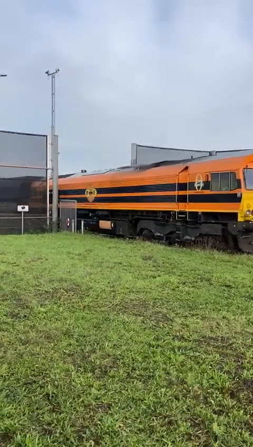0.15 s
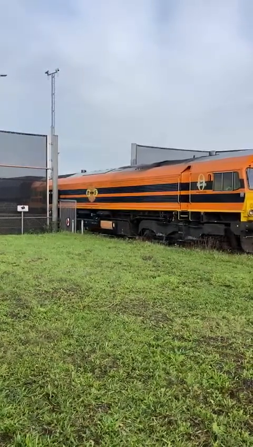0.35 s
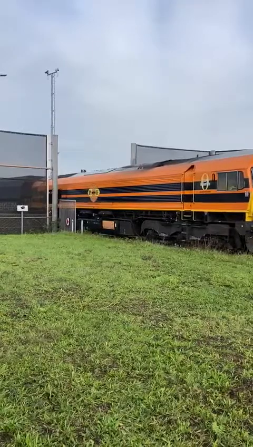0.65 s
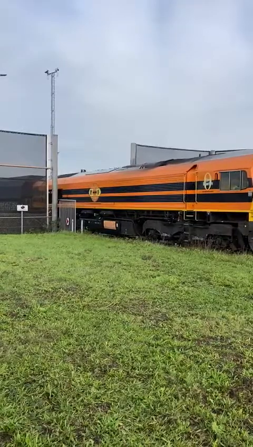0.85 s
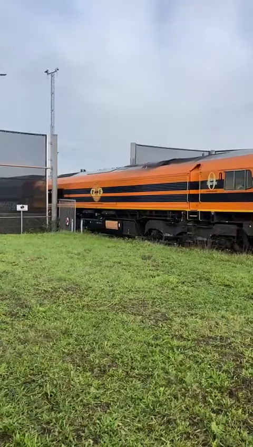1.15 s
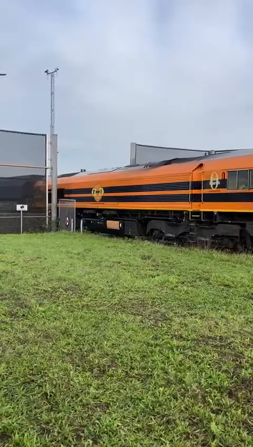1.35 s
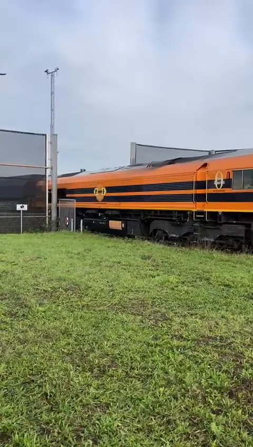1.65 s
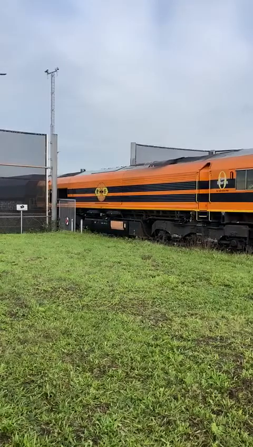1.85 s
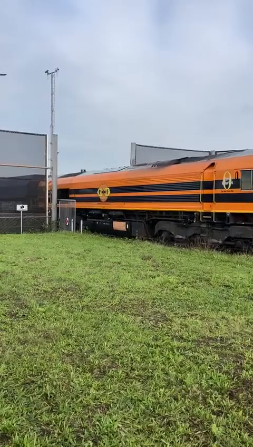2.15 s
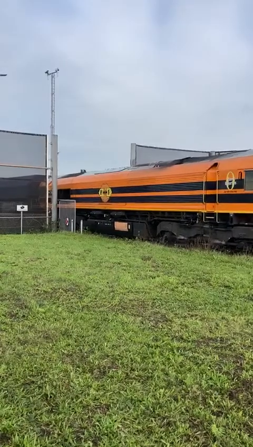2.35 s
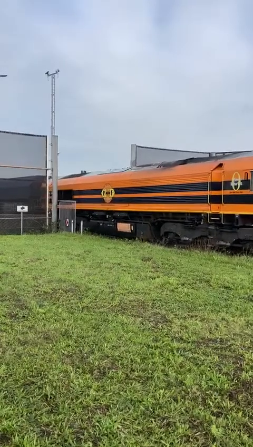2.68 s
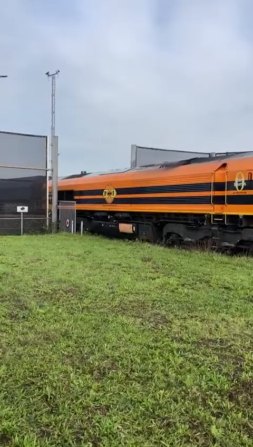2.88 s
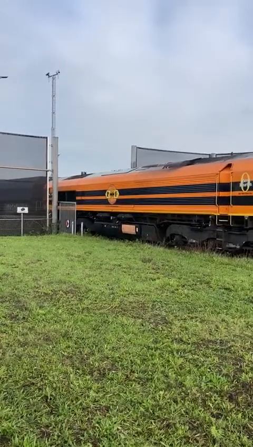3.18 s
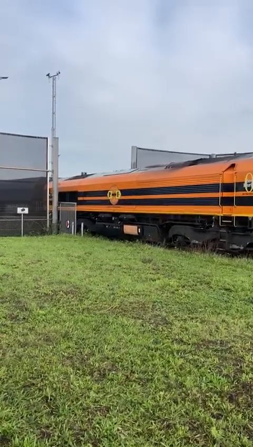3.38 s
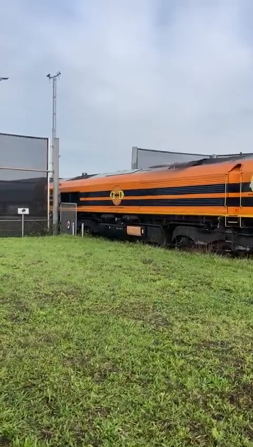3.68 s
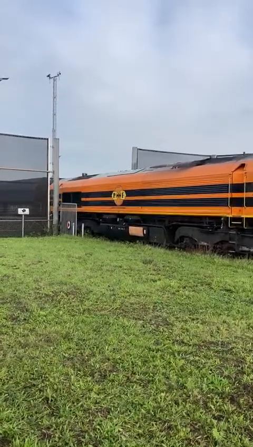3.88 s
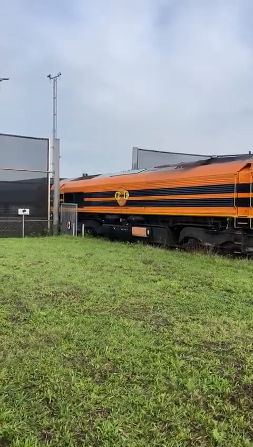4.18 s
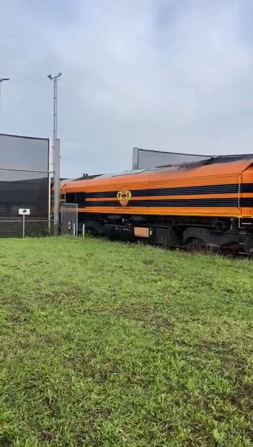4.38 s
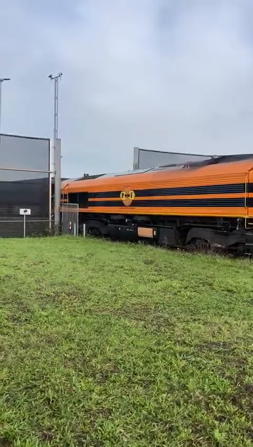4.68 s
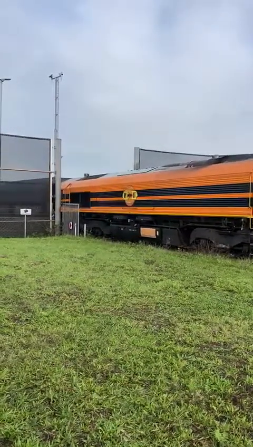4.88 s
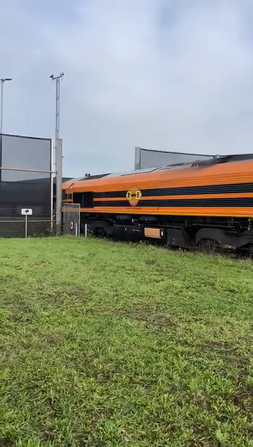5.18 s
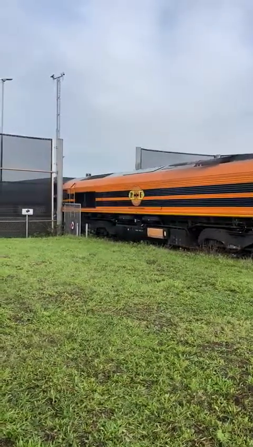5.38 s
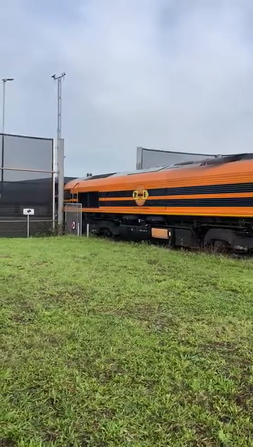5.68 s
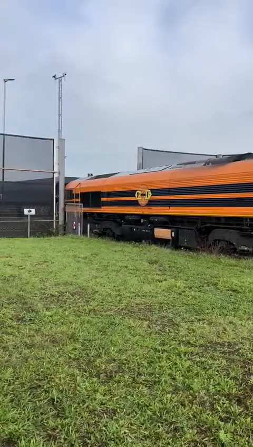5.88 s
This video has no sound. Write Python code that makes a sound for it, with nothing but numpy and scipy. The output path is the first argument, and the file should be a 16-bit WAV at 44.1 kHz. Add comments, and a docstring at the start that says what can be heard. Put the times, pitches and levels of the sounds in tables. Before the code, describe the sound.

A heavy diesel locomotive works slowly past a handheld stereo microphone at the edge of a grass field. From 0 s a deep, uneven exhaust throb pulses about eight times a second, rising in strength until about 1.6 s, then holding nearly steady to the end at 6 s. Over it lie dull block knocks, a dense metallic rattle, a broad fan and blower roar, and thin wavering whines that swell as the intakes draw level. Low wind buffets the microphone at the start, around 0.9 and 1.2 s, and more roughly near 2.1 s. A brighter chug stands out from about 1.9 to 3.5 s. At 2.8 s a valve spits a short, sharp hiss, leaving a faint leak of air. A fine high blower tone peaks near 4 s. At 5.4 s a second, stronger hiss swells for about a quarter second and dies abruptly, while the engine rumbles on.

```python
"""A two-stroke diesel locomotive creeps past under load, heard across a grass field.
Its exhaust and knocking block are sums of tones locked to the crank, so they throb once a turn.
Shaped noise makes the roar of fans and blower, the whines, and the air that valves vent twice.
Wind, as low lumpy noise, buffets the handheld stereo microphone."""
import sys
import numpy as np
from scipy import signal
from scipy.fft import rfft, irfft, next_fast_len
from scipy.io import wavfile
from scipy.ndimage import uniform_filter1d, map_coordinates

SR = 44100
rng = np.random.default_rng(int(sys.argv[2]) if len(sys.argv) > 2 else 0)


def pcm_store(signal):
    """Save signal as 16-bit PCM."""
    levels = np.round(np.clip(np.atleast_2d(signal), -1, 1) * 32767)
    wavfile.write(sys.argv[1], SR, levels.astype(np.int16).T)


N = 265923
SECONDS = np.arange(N) / SR
FRAME = 512  # samples in a short-time spectrum

# Gusts on the microphone. Each row: middle in seconds, half length in seconds, level in dB before
# shaping, top of the buffeting in Hz.
GUSTS = [(0.055, 0.051, -16, 129), (0.894, 0.12, -20.5, 70.4), (1.189, 0.053, -9, 110),
         (2.033, 0.03, -12, 60), (2.11, 0.052, -7.5, 944), (2.157, 0.012, -8, 130),
         (2.204, 0.013, -10.5, 300)]
GUST_LOW_HZ = 60  # the top never sinks below this
GUST_EDGE, GUST_PEAKING = 2.2, 0.67  # steepness of the level's edges, of the rise in top pitch
BREEZE_DB, BREEZE_FADE_DB_PER_S, BREEZE_HZ, BREEZE_LUMPS_DB = -22.5, 4.5, 71, -3

# Fans, blower and combustion. Each row: frequency in Hz, relative density in dB per Hz.
ROAR_SPECTRUM = [(25, -34), (45, -16), (80, -11), (130, -14), (220, -19), (400, -27), (650, -24),
                 (820, -27), (1050, -25), (1400, -30), (1900, -33), (2400, -34), (2800, -38), (4400, -40),
                 (5500, -44), (7700, -46), (9500, -52), (11000, -56)]
ROAR_DB, ROAR_FOLLOWS = -27.5, 0.076  # level, share of the exhaust's swing

# Narrow whines of blower and turbocharger. Each row: centre in Hz, width of one filter pass in Hz,
# level in dB before the swell.
WHINES = [(1910, 30, -53), (3250, 70, -51), (3400, 250, -49), (4270, 120, -54), (7700, 150, -52)]
# The whines swell as the air intakes draw level. Each row: time in seconds, gain in dB.
WHINE_SWELL = [(0, 0), (1.3, 5.5), (3.4, 2.5), (4.0, 3.5), (4.5, 4), (6.03, 4.5)]

# Hiss of escaping air. Each row: frequency in Hz, relative density in dB per Hz.
JET_SPECTRUM = [(700, -11), (1500, -15), (2350, -4), (2900, -12.5), (3500, -6), (4500, -4), (6500, 3.5),
                (7500, 2.5), (9000, 7.5), (11000, -0.5)]
# Valves vent air. Each row: opening in seconds, first spit below the peak in dB, swell in seconds,
# hold in seconds, peak in dB before the body lift, dying in dB per second, lift of the body under
# 4 kHz in dB, time to crack open in seconds.
VENTS = [(2.821, 8.5, 0.084, 0.016, -21, 118, 7.5, .002), (5.401, 19, 0.16, 0.1, -15.5, 203, 10.5, 0.042)]
SEEP_DB = -48.5

# Two gear meshes sing close together. Each row: time in seconds, upper tone in dB, lower tone in dB.
GEAR_LEVELS = [(0, -50, -51), (.3, -33, -31.5), (.85, -37, -46), (1.25, -34.5, -42), (2.1, -31, -47),
               (2.6, -27, -31), (3.0, -30.5, -31), (3.7, -32, -35.5), (4.2, -38, -37), (4.7, -32, -45),
               (5.05, -34, -40), (5.25, -34, -35.5), (6.03, -41, -26.5)]
UPPER_GEAR_ORDER, LOWER_GEAR_ORDER = 117.2, 113  # multiples of crank speed

# Thin tones of the geared blower. Each row: multiple of crank speed, relative level in dB.
BLOWER_TONES = [(283.6, -6), (503.6, -8), (515.4, 0)]
# They follow this as the intake draws level. Each row: time in seconds, gain in dB.
BLOWER_LEVEL = [(0, -51.5), (1.3, -47.5), (2.8, -48.5), (3.7, -43), (4.0, -37.5), (4.6, -44.5), (5.05, -42),
                (5.5, -51), (6.03, -32.5)]

# Valve gear and injectors rattle: orders (the last left out), level, spread between orders,
# fall per octave, rate of change.
RATTLE_FIRST, RATTLE_LAST = 92, 330
RATTLE_DB, RATTLE_SPREAD_DB, RATTLE_FALL_DB, RATTLE_CHANGE_PER_S = -38.5, 2, 6, .5

# Tones locked to the crank. Each row: multiple of crank speed (its order), relative level in dB.
CRANK_TONES = [(5, -33), (7, -39), (9, -20), (10, -20), (11, -28), (12, -31), (13, -31), (14, -36),
               (15, -40), (16, -38), (17, -36), (18, -35), (19, -38), (20, -45), (21, -46), (22, -44),
               (24, -41), (25, -40), (26, -46), (27, -42), (28, -39), (29, -46), (30, -36), (32, -38),
               (33, -45), (34, -35), (35, -47), (37, -45), (38, -40), (39, -41), (40, -38), (41, -39),
               (42, -46), (45, -47), (46, -45), (47, -39), (48, -40), (49, -44), (50, -49), (51, -47),
               (52, -47), (54, -39), (55, -42), (56, -39), (57, -40), (59, -42), (60, -43), (61, -44),
               (63, -38), (64, -47), (65, -45), (66, -43), (67, -45), (68, -42), (69, -43), (71, -39),
               (72, -42), (73, -42), (74, -39), (75, -43), (76, -44), (77, -41), (78, -39), (79, -30),
               (80, -41), (81, -37), (82, -40), (83, -41), (84, -42), (85, -42), (86, -36), (87, -37),
               (88, -39), (90, -46), (91, -49), (96, -50), (97, -48), (99, -51), (101, -50), (103, -51),
               (105, -50), (112, -45), (119, -49), (152, -48), (158, -45), (200, -49), (226, -47)]
# The governor brings the crank down to its set speed without overshoot.
SET_SPEED, SPEED_EXCESS, SETTLE_S = 8.1752, .0635, .658  # turns per s, first excess, seconds
# The engine room draws past. Each row: time in seconds, exhaust gain in dB.
PASSING = [(0, -9.5), (.5, -3.5), (1.6, 1.5), (3.0, 0), (4.4, 2.5), (6.03, 0)]
LAST_EXHAUST_ORDER = 12
THROB_TURN, THROB_SKEW = .554, -.8  # crank angle of the throb (turns), skew of its pulse (rad)
SILENCER_ORDER, SILENCER_LAG = 10.5, 1.3  # orders above its resonance lag behind (rad)
PIPE_ORDER = 8  # orders under the stack's resonance push in opposite phase

BLOCK_DB, BLOCK_FOLLOWS = 0.5, 0.055  # engine block: level, share of the exhaust's swing
# Knocks that ring in the block each turn, from dull thumps to a bright one. Each row: first order,
# last order, crank angle in turns, scatter in rad, lead of its top orders over its bottom ones in turns.
KNOCKS = [(13, 17, .255, .25, 0), (18, 19, .735, .25, 0), (20, 29, .63, 1.0, 0), (54, 75, .17, .8, .3),
          (76, 90, .3, .5, 0)]
REBOUND_TURN = .26  # the bright knock's second blow follows after (turns)
SLIP_ORDER = 30  # orders below this fade and slip the less, the lower they lie
FADING_DB = 2.2  # spread of the fading of single orders
# The top of the bright knock stands out for a while. Each row: time in seconds, gain in dB.
CHUG = [(0, -3), (1.2, -2), (1.9, 2), (3.45, 2.5), (3.65, -3.5), (6.03, -3.5)]
CHUG_ORDER = 80  # lowest order the chug lifts
# The low hum of the block thins out late.
HUM_FIRST, HUM_LAST, HUM_FADE_S, HUM_FADE_DB_PER_S = 35, 45, 4.7, 4

# Stereo by frequency. Each row: frequency in Hz, right channel's lead in rad, left louder by in dB,
# level of the unlike part in dB.
STEREO = [(60, .2, 5, -16), (260, .4, 6, -11), (600, 1.8, 3, -6), (800, 2.0, 0, -5), (1400, 1.5, 0, -2),
          (1750, 1.4, 0, -2), (2250, 2.4, -4, 0), (2750, 2.5, 0, -3), (3450, 2.5, 0, -5),
          (4250, 1.7, 0, -3), (4500, 2.4, 0, -10), (4750, 3.14, 0, -35), (6300, 3.14, 0, -35),
          (6900, 2.0, 0, -2), (7700, 1.0, 0, -5), (7950, 0, 0, -35), (9600, 0, 0, -35),
          (10200, -1.6, 0, -3), (10700, -2.6, 0, -10), (10950, -3.14, 0, -50)]
# Stereo of the vented hiss: its channels oppose each other over a narrower treble band.
# Each row: frequency in Hz, right channel's lead in rad, left louder by in dB, level of the unlike
# part in dB.
HISS_STEREO = [(4850, 2.0, 0, -6), (5100, 3.14, 0, -35), (5650, 3.14, 0, -35), (5950, 2.8, 0, -16),
               (6400, 1.8, 0, -5)]
# Both channels share one bass below a corner that holds, then sinks steadily.
MONO_HZ, MONO_HOLD_S, MONO_SINK_HZ_PER_S = 910, 2.77, 395

DUCK_ABOVE_DB, DUCK_SHARE, DUCK_ATTACK_S, DUCK_RELEASE_DB_PER_S = -19, .6, .09, 12
CUTOFF_HZ = 11700


def amp(db):
    """Gain of a dB value."""
    return 10 ** (np.asarray(db) / 20)


def rms_one(x):
    """Scale to rms 1."""
    return x / np.sqrt(np.mean(x ** 2))


def curves(rows, at):
    """Each further column of a table, read along its first column."""
    first, *columns = np.transpose(rows)
    return [np.interp(at, first, column) for column in columns]


def over_hz(rows, hz):
    """Columns of a table read on a log-frequency axis."""
    log_rows = [(np.log(row[0]), *row[1:]) for row in rows]
    return curves(log_rows, np.log(np.maximum(hz, 1)))


def drift(rate):
    """Slow chance: random points joined smoothly, rate a second, spread about 1."""
    coarse = np.arange(0, N + 64, 64)
    points = rng.standard_normal(400)
    smooth = map_coordinates(points, [coarse / SR * min(rate, 60)], order=3)
    return np.interp(np.arange(N), coarse, smooth)


def frames(x):
    """Short-time spectrum: Hz as a column, seconds, values."""
    hz, s, z = signal.stft(x, SR, nperseg=FRAME)
    return hz[:, None], s, z


def samples(z):
    """Back from short-time spectra to N samples."""
    return signal.istft(z, SR, nperseg=FRAME)[1][..., :N]


def coloured(spectrum):
    """Noise with the given spectrum, rms 1."""
    size = next_fast_len(N)
    db, = over_hz(spectrum, np.fft.rfftfreq(size, 1 / SR))
    white = rfft(rng.standard_normal(size))
    return rms_one(irfft(white * amp(db), size)[:N])


def patchy(x, patch_db, rate):
    """Each half octave swells and sinks on its own."""
    hz, s, z = frames(x)
    half_octaves = 2 * np.log2(np.maximum(hz, 30) / 30)
    grid = np.broadcast_arrays(half_octaves, min(rate, 60) * s)
    patches = map_coordinates(rng.standard_normal((22, 400)), grid, order=1)
    return samples(z * amp(patch_db * patches))


def breeze():
    """Low lumpy rumble on the microphone that dies away."""
    band = signal.butter(2, [36, BREEZE_HZ], "band", fs=SR, output="sos")
    rumble = rms_one(signal.sosfilt(band, rng.standard_normal(N)))
    return rumble * amp(BREEZE_DB - BREEZE_FADE_DB_PER_S * SECONDS + BREEZE_LUMPS_DB * drift(6.9))


def wind():
    """Gusts of lumpy pressure noise that reach higher in the middle, over the breeze."""
    hz, s, z = frames(rng.standard_normal(N) * amp(1.5 * drift(35.)))
    level, top_hz = np.zeros(len(s)), np.full(len(s), float(GUST_LOW_HZ))
    for middle, half, db, gust_hz in GUSTS:
        off = np.abs(s - middle) / half
        level = level + amp(db) * np.exp(-off ** GUST_EDGE)
        top_hz = np.maximum(top_hz, gust_hz * np.exp(-GUST_PEAKING * off ** 2))
    eddies = hz / (hz + 0.26 * top_hz)  # fast air breaks into small eddies and thins the bass
    rolloff = 1 / (1 + (hz / top_hz) ** 3.84)
    narrowing_gain = np.sqrt(SR / 2 / top_hz)  # makes up for the narrower band
    gust = samples(z * level * eddies * rolloff * narrowing_gain)
    high_pass = signal.butter(2, 35, "high", fs=SR, output="sos")
    return signal.sosfilt(high_pass, gust) + breeze()


def seep():
    """A thin steady leak of air, from the first valve's opening until the last begins to die."""
    opens, _, swell, hold = VENTS[-1][:4]
    leaking = (SECONDS > VENTS[0][0]) * (SECONDS < opens + swell + hold)
    return amp(SEEP_DB) * leaking * coloured(JET_SPECTRUM)


def vented_air():
    """A bright turbulent jet: each valve spits open, swells, holds and dies; its body depends on the valve."""
    jet = patchy(coloured(JET_SPECTRUM), patch_db=3.2, rate=50.)
    body = signal.sosfilt(signal.butter(2, 4000, fs=SR, output="sos"), jet)
    out = np.zeros(N)
    for opens, spit_db, swell, hold, peak_db, dying_db, body_db, crack in VENTS:
        since = SECONDS - opens
        below_db = spit_db * np.clip(1 - since / swell, 0, 1)
        died_db = dying_db * np.maximum(since - swell - hold, 0)
        opening = np.clip(since / max(crack, 1 / SR), 0, 1)
        out += opening * amp(peak_db - below_db - died_db) * (jet + (amp(body_db) - 1) * body)
    return out


def roar(exhaust_db):
    """Broad turbulent noise of fans, blower and combustion, faintly following the exhaust."""
    noise = patchy(coloured(ROAR_SPECTRUM), patch_db=1.3, rate=8.)
    return amp(ROAR_DB + ROAR_FOLLOWS * exhaust_db) * noise


def whines():
    """Noise twice through each narrow resonance, wavering in level under a common swell."""
    out = np.zeros(N)
    for hz, width_hz, db in WHINES:
        r = np.exp(-np.pi * width_hz / SR)
        section = [1, 0, -1, 1, -2 * r * np.cos(2 * np.pi * hz / SR), r * r]
        ringing = signal.sosfilt([section, section], rng.standard_normal(N))
        out += amp(db + .8 * drift(1.5)) * rms_one(ringing)
    swell_db, = curves(WHINE_SWELL, SECONDS)
    return amp(swell_db) * out


def crank_angle():
    """Crank angle in radians, as the speed settles with critical damping."""
    settling = SECONDS / SETTLE_S
    speed = SET_SPEED + SPEED_EXCESS * (1 + settling) * np.exp(-settling)
    return 2 * np.pi * np.cumsum(speed) / SR


def gears(crank):
    """Two thin wavering tones geared to the crank."""
    upper_db, lower_db = curves(GEAR_LEVELS, SECONDS)
    upper = np.cos(UPPER_GEAR_ORDER * crank + 0.35 * drift(5.0))
    lower = np.cos(LOWER_GEAR_ORDER * crank + 0.35 * drift(5.0))
    return amp(upper_db + 2.5 * drift(8.0)) * upper + amp(lower_db + 2.5 * drift(12.0)) * lower


def blower(crank):
    """Thin tones geared to the crank, flickering a little."""
    level_db, = curves(BLOWER_LEVEL, SECONDS)
    tones = np.zeros(N)
    for order, db in BLOWER_TONES:
        tones += amp(db + 2.4 * drift(6.0)) * np.cos(order * crank + .35 * drift(15.0))
    return amp(level_db) * tones


def rattle(crank):
    """A dense pattern of small contacts repeated each turn; three such patterns fade slowly in and out."""
    orders = np.arange(RATTLE_FIRST, RATTLE_LAST)
    turns = crank / (2 * np.pi) % 1
    out = np.zeros(N)
    for _ in range(3):
        fall_db = RATTLE_FALL_DB * np.log2(orders / RATTLE_FIRST)
        db = RATTLE_SPREAD_DB * rng.standard_normal(len(orders)) - fall_db
        lines = np.zeros(4097, complex)
        lines[orders] = amp(db) * np.exp(2j * np.pi * rng.random(len(orders)))
        pattern = irfft(lines)  # one turn of the crank
        angles = np.arange(len(pattern)) / len(pattern)
        out += drift(RATTLE_CHANGE_PER_S) * np.interp(turns, angles, pattern, period=1)
    running_power = uniform_filter1d(out ** 2, size=20000)
    return amp(RATTLE_DB) * rms_one(out / np.sqrt(running_power + 1e-12))  # held level


def knock_phase(order):
    """Phase lag that lines an order up with its knock's blow; orders outside the knocks fall at random."""
    late = rng.uniform(0, 2 * np.pi)
    for first, last, turn, scatter, lead in KNOCKS:
        if first <= order <= last:
            chirp = np.pi * lead * (order - (first + last) / 2) ** 2 / (last - first)
            late = 2 * np.pi * turn * order - chirp + scatter * rng.standard_normal()
    if order >= KNOCKS[-1][0]:  # from the bright knock up, phased as two blows
        late -= np.angle(1 + np.exp(-2j * np.pi * REBOUND_TURN * order))
    return late


def block_knocks(crank):
    """High orders buzz and knock; paths from the moving block shift against each other, so they fade and slip."""
    chug_db, = curves(CHUG, SECONDS)
    hum_fade_db = HUM_FADE_DB_PER_S * np.maximum(SECONDS - HUM_FADE_S, 0)
    out = np.zeros(N)
    for order, db in CRANK_TONES:
        if order <= LAST_EXHAUST_ORDER:
            continue
        late = knock_phase(order)
        slip = min(order / SLIP_ORDER, 1) ** 2
        level_db = db + slip * FADING_DB * drift(1.176)
        if CHUG_ORDER <= order <= KNOCKS[-1][1]:
            level_db = level_db + chug_db
        if HUM_FIRST <= order <= HUM_LAST:
            level_db = level_db - hum_fade_db
        out += amp(level_db) * np.cos(order * crank - late + slip * 0.5 * drift(0.806))
    return out


def exhaust_throb(crank):
    """Uneven firing repeats every turn, so the low orders beat into a throb."""
    out = np.zeros(N)
    for order, db in CRANK_TONES:
        if order > LAST_EXHAUST_ORDER:
            continue
        late = 2 * np.pi * THROB_TURN * order - THROB_SKEW
        if order > SILENCER_ORDER:
            late += SILENCER_LAG
        if order < PIPE_ORDER:
            late += np.pi
        out += amp(db + 1.76 * drift(1.84)) * np.cos(order * crank - late)
    return out


def engine_tones(exhaust_db):
    """Exhaust, block and geared parts all turn with one crank."""
    crank = crank_angle()
    exhaust = amp(exhaust_db) * exhaust_throb(crank)
    block = amp(BLOCK_DB + BLOCK_FOLLOWS * exhaust_db) * block_knocks(crank)
    return exhaust + block + gears(crank) + blower(crank) + rattle(crank)


def stereo(x, table, frames_alike, bins_alike, unlike_gain_db):
    """Spread a sound by a phase and level step plus a part unlike in each channel; the bass is shared."""
    hz, s, z = frames(x)
    lead, left_db, unlike_db = over_hz(table, hz)
    mono_hz = np.maximum(MONO_HZ - MONO_SINK_HZ_PER_S * np.maximum(s - MONO_HOLD_S, 0), 10)
    apart = 1 / (1 + (mono_hz / np.maximum(hz, 1)) ** 10.0)
    step = amp(apart * left_db / 2) * np.exp(-.5j * apart * lead)
    # random phases make part of each channel unlike the other: slow for tones, fresh each frame for noise
    bins = np.arange(len(hz))[:, None] / bins_alike
    grid = np.broadcast_arrays(bins, np.arange(len(s)) / frames_alike)
    half_turns = np.array([map_coordinates(rng.standard_normal(z.shape), grid, order=1)
                           for _ in range(2)])
    unlike = apart * amp(unlike_db + unlike_gain_db) * z * np.exp(1j * np.pi * half_turns)
    return samples(np.array([z * step, z / step]) + unlike)


def scene():
    """Wind, air and engine in stereo."""
    exhaust_db, = curves(PASSING, SECONDS)
    noise = wind() + seep() + roar(exhaust_db) + whines()
    low, high = HISS_STEREO[0][0] * .9, HISS_STEREO[-1][0]
    outside = [row for row in STEREO if not low < row[0] < high]
    hiss_stereo = sorted(outside + HISS_STEREO)
    out = stereo(noise, STEREO, frames_alike=1, bins_alike=1, unlike_gain_db=-0.5)
    out = out + stereo(vented_air(), hiss_stereo, frames_alike=1, bins_alike=1, unlike_gain_db=0.0)
    tones = engine_tones(exhaust_db)
    return out + stereo(tones, STEREO, frames_alike=60, bins_alike=6, unlike_gain_db=-1.0)


def record(dry):
    """Gain control ducks when the left channel is loud above the bass, then creeps back; peaks round, top is cut."""
    high_pass = signal.butter(2, 300, "high", fs=SR, output="sos")
    above_bass = signal.sosfilt(high_pass, dry[0])
    level_db = 10 * np.log10(uniform_filter1d(above_bass ** 2, size=2000) + 1e-12)
    excess_db = np.maximum(level_db - DUCK_ABOVE_DB, 0)
    release_db = DUCK_RELEASE_DB_PER_S * SECONDS
    held_db = np.maximum.accumulate(excess_db + release_db) - release_db  # peaks sink at a steady rate
    r = np.exp(-1 / (DUCK_ATTACK_S * SR))
    duck_db = DUCK_SHARE * signal.lfilter([1 - r], [1, -r], held_db)
    ducked = dry * amp(-duck_db)
    rounded = 1.1 * np.tanh(ducked / 1.1)
    return signal.sosfilt(signal.ellip(10, .5, 70, CUTOFF_HZ, fs=SR, output="sos"), rounded)


dry = scene()
out = record(dry)
pcm_store(out)
```